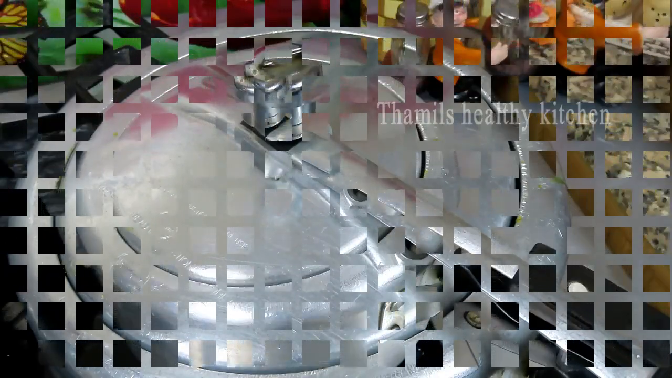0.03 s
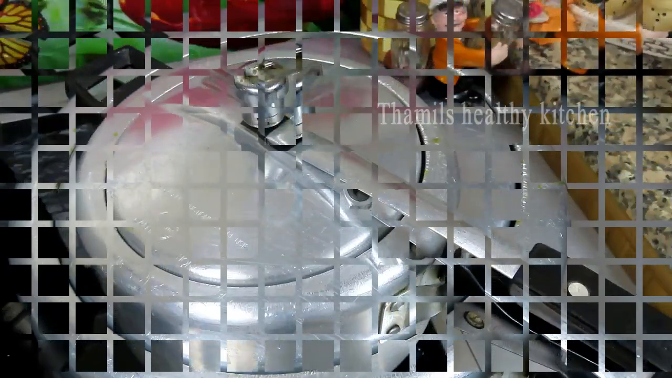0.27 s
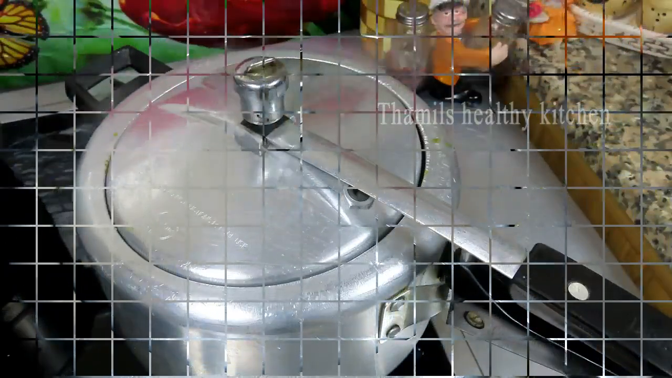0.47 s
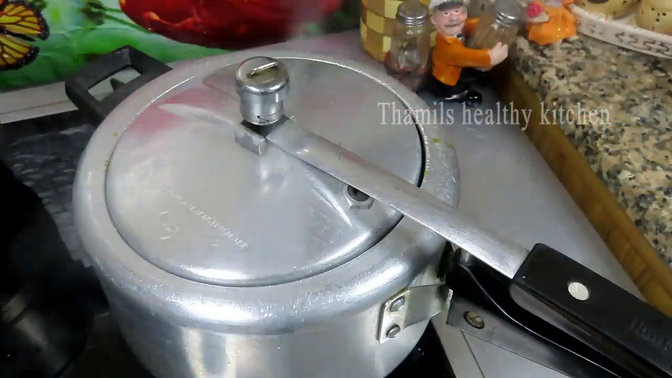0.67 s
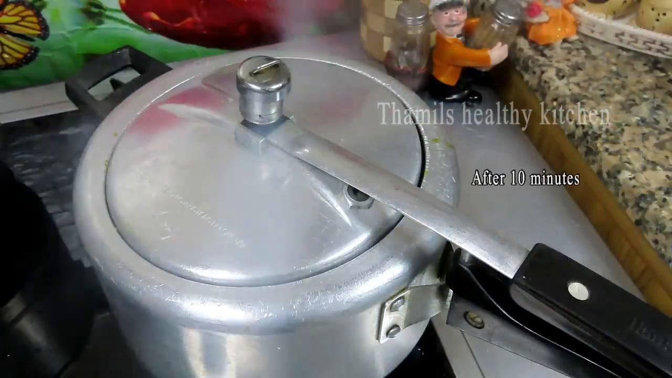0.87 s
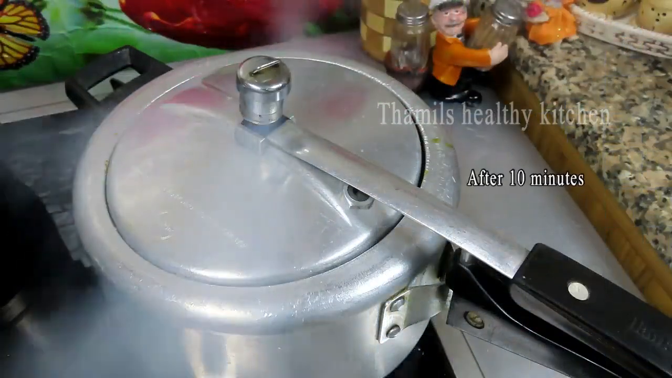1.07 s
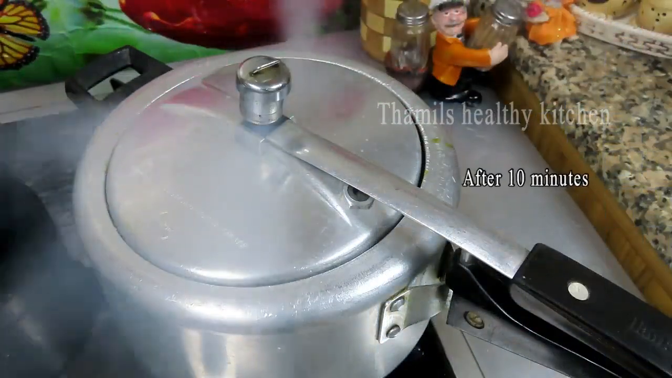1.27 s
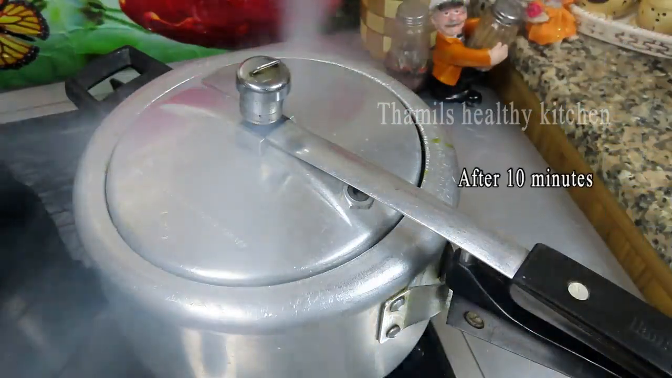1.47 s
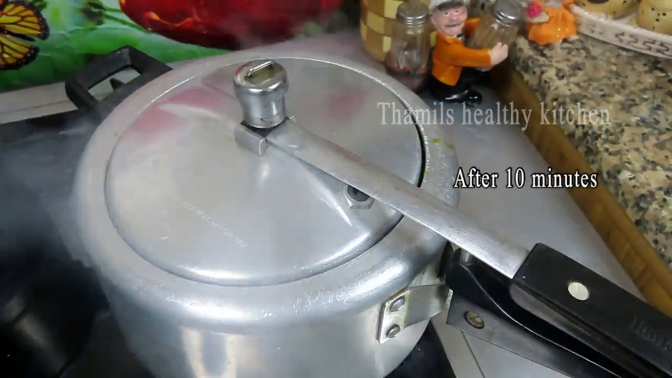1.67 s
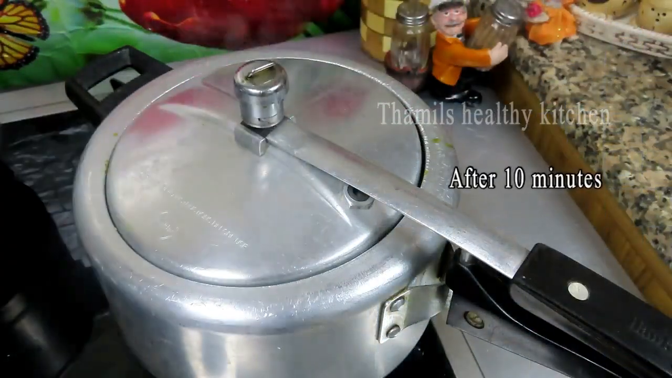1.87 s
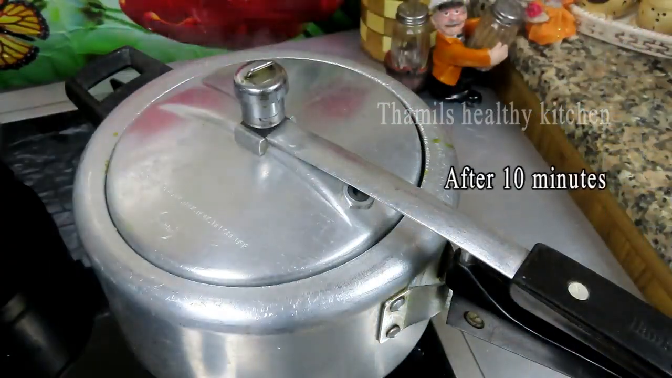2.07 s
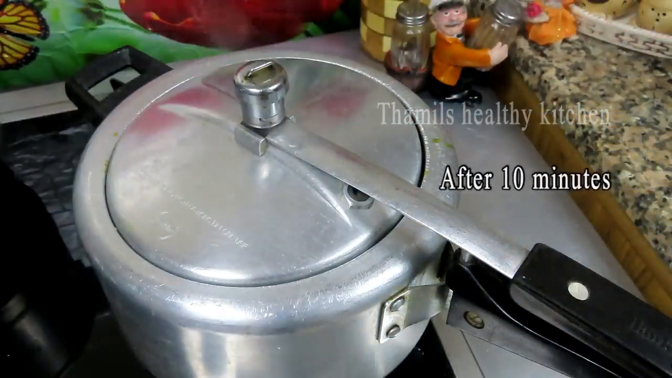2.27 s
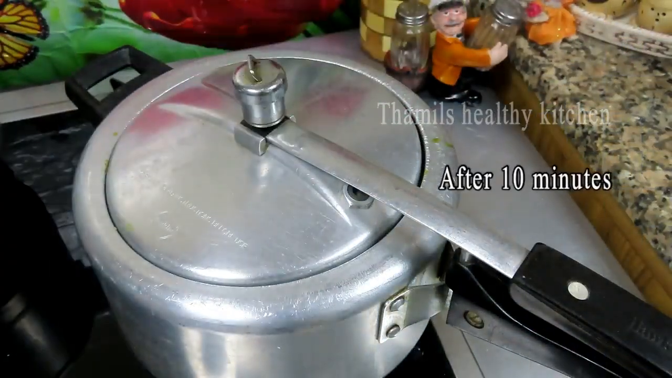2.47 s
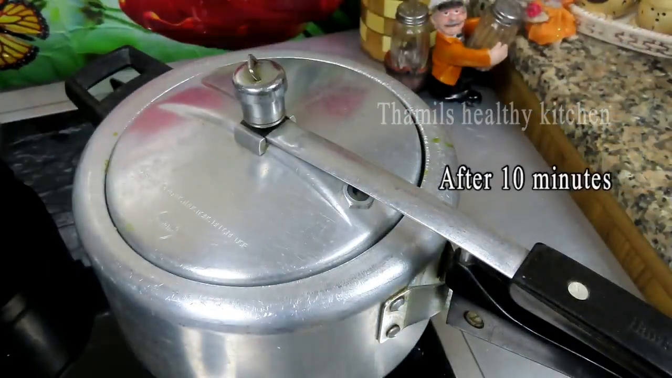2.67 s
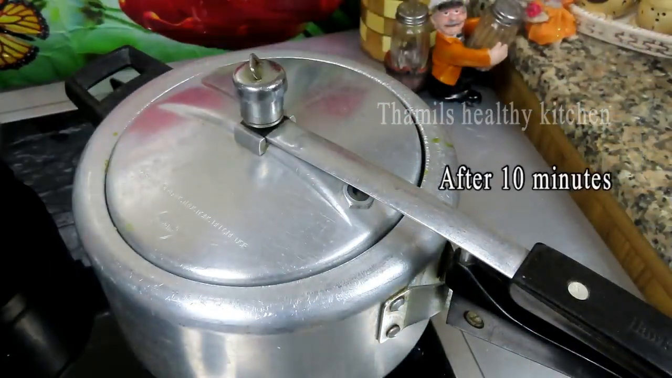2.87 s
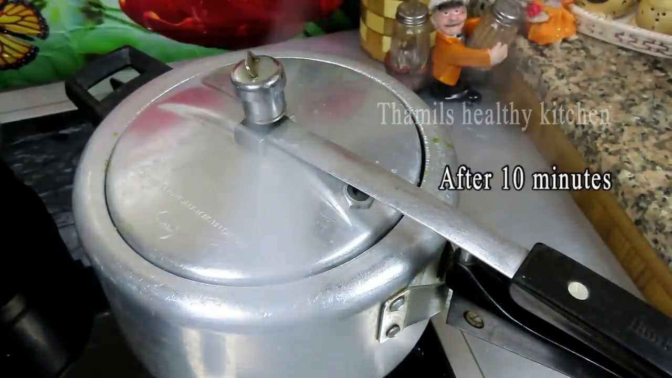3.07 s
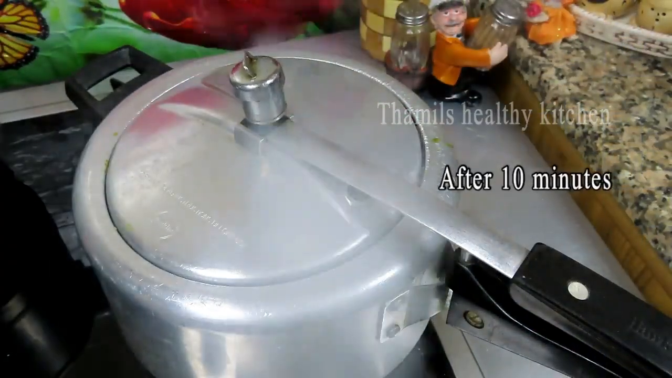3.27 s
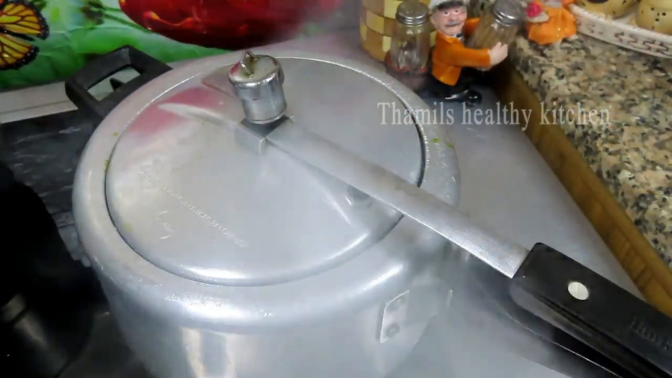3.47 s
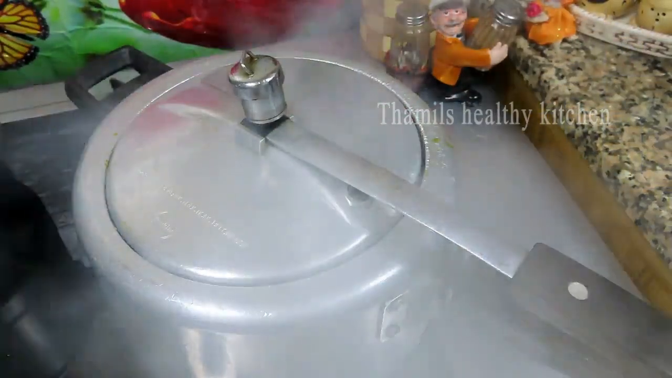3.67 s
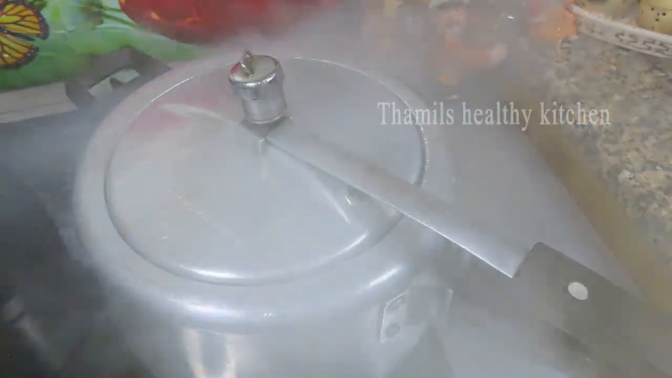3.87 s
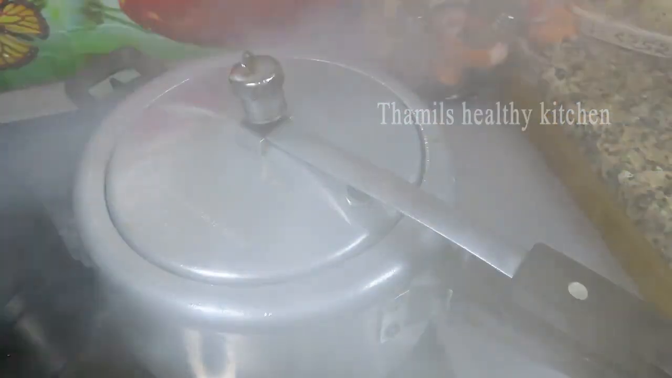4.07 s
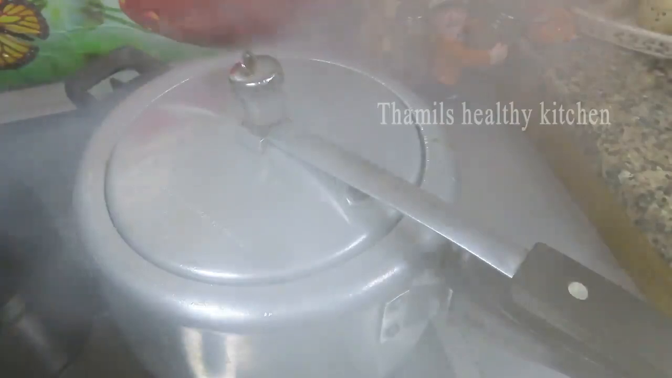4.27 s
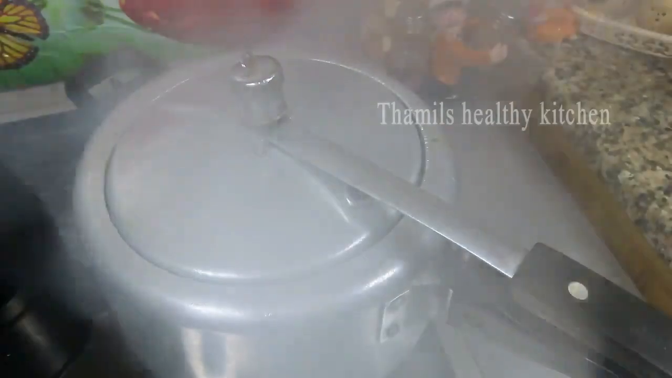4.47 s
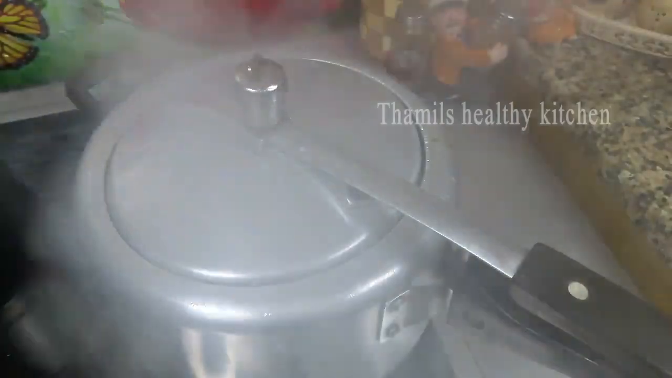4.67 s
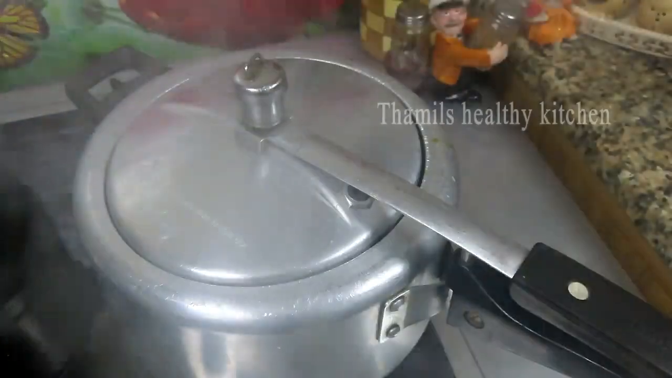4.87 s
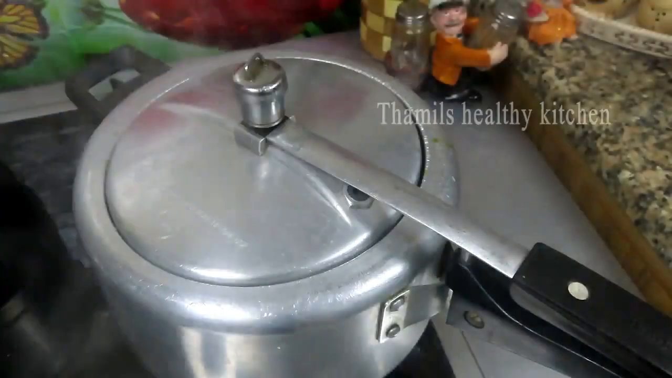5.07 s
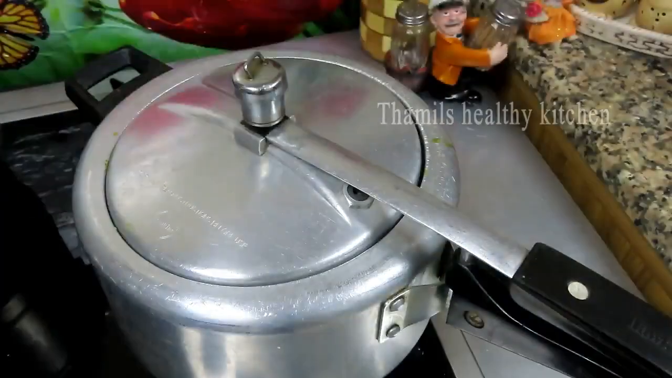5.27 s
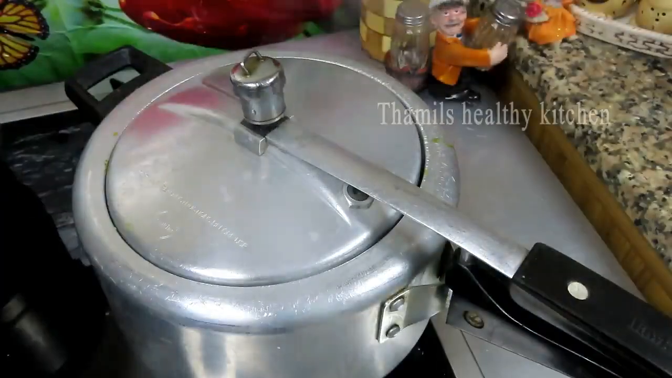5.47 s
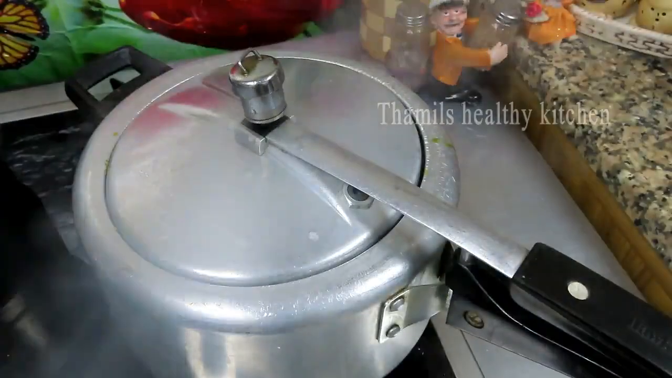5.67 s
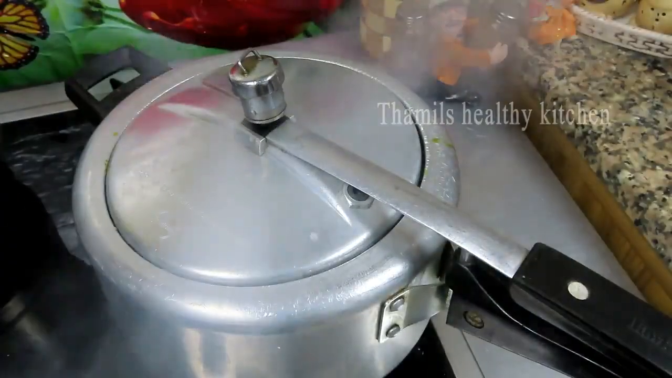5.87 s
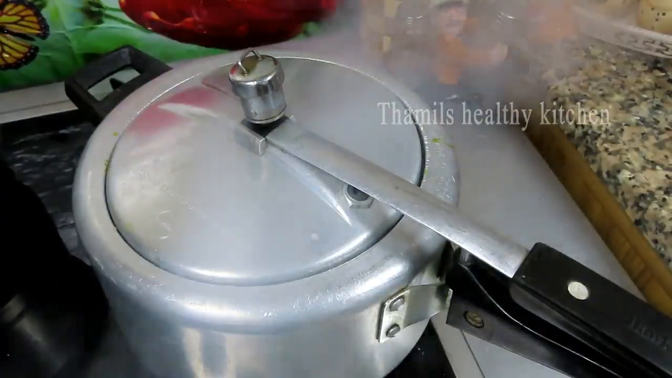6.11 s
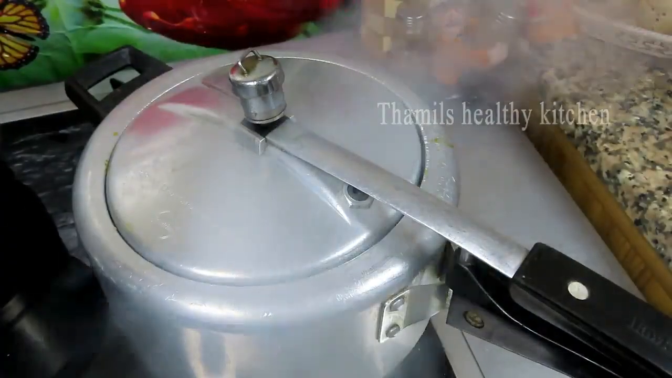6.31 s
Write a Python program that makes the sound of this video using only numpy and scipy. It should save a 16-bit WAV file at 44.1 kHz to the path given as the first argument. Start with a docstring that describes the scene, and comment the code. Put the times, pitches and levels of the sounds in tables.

```python
"""A pressure cooker vents three times in a small kitchen: steam leaks, lifts the weight, sputters and hisses.
The steam is banded noise that follows the valve flow, coloured by lid, walls and a set of peaks per blast.
Dull bangs from further off, perhaps firecrackers, and a low whoosh of steam at the first lift are a short
wave, then decaying noise. A faint knock, a sharp crack and clacks of the weight are noise bursts plus modes.
Puffs pop on the microphone; stirred air, the steam cloud and the steady stove are shaped noise."""
import sys
import numpy as np
from scipy.fft import rfft, irfft, next_fast_len
from scipy.io import wavfile
from scipy.ndimage import map_coordinates

SR = 44100
rng = np.random.default_rng(int(sys.argv[2]) if len(sys.argv) > 2 else 0)


def generate_wav(sig):
    """Save sig (samples, or channels by samples) to the path in sys.argv[1] as 16-bit PCM at SR."""
    pcm = np.round(np.clip(np.atleast_2d(sig).T, -1, 1) * 32767).astype(np.int16)
    wavfile.write(sys.argv[1], SR, pcm)


N = 279726  # samples
TOP_HZ = 15780

# Spectra of the parts of the steam. Each row: frequency in Hz, relative density in dB per Hz.
ROAR_BAND = [(30, -29), (90, -14), (200, -3.5), (450, 0.5), (700, 2), (1100, 1), (1500, -6), (2500, -46)]
SPRAY_BAND = [(600, -30), (1000, -8), (1300, -3.5), (1700, 0.5), (2500, 0), (2900, -9.5), (4000, -48)]
RUSH_BAND = [(1500, -23), (2300, -7.5), (2700, 0), (4000, 1), (5400, 1.5), (6000, -3), (8000, -50)]
RING_BAND = [(4000, -47), (5200, -21), (5700, -0.5), (6800, 3), (7500, 0.5), (8100, -12), (10000, -53)]
FIZZ_BAND = [(6000, -60), (7400, -2), (8100, 2), (10000, 2), (12500, 0.5), (14800, 0.5), (15800, -7)]
# Resonances and notches of weight, lid and nearby surfaces.
# Each row: centre in Hz, width in Hz, gain in dB before scaling by lid_depth.
LID_RESONANCES = [(991, 240, -1.4), (1367, 80, 1.3), (1701, 240, 1.2), (1981, 50, -2.7), (2099, 30, 1.4),
                  (2164, 140, 2.2), (2422, 80, 2.0), (2552, 50, -2.5), (2810, 30, 3.2), (2853, 50, -2.5),
                  (2946, 30, 2.2), (3025, 80, 1.2), (3381, 80, 1.4), (3628, 30, 2.6), (3844, 50, -2.5),
                  (4021, 30, 2.2), (4098, 30, 2.0), (4231, 30, 1.8), (4550, 40, 2.3), (4608, 50, -2.3),
                  (5378, 50, 1.8), (5469, 80, -2.2), (6019, 50, 1.8), (6379, 50, 1.8), (6915, 80, 1.2),
                  (8465, 80, 1.5), (8718, 60, 1.5), (10508, 140, 1.2)]
# Peaks and notches in the colour of each blast. Each row: # centre in Hz, width in Hz, gain in dB.
FIRST_COLOUR = [(546, 150, -4), (1345, 70, 3.5), (1690, 160, 2.5), (1930, 100, 1.5), (2170, 100, 3),
                (5555, 67, 1.5), (5900, 230, 2.5), (6000, 130, -2), (6400, 180, 0.5), (6920, 120, 4.5),
                (7330, 230, 3), (7800, 260, -6), (11500, 480, 2.5), (13500, 500, 2), (13750, 300, -1)]
SECOND_COLOUR = [(2740, 40, 1), (4530, 80, 1.5), (5060, 120, 1.5), (6100, 200, -0.5), (6330, 170, -1.5),
                 (6400, 140, 1.5), (6840, 140, 3), (7460, 160, 3), (7740, 250, -2.5), (8160, 200, 2.5),
                 (8740, 100, 3.5), (9900, 100, 3), (10300, 350, 0), (12300, 800, -2), (15300, 900, 3.5)]
THIRD_COLOUR = [(850, 270, -1.5), (1400, 210, -1.5), (1730, 150, 1.5), (1970, 120, -2), (2670, 120, 2),
                (4400, 220, -3), (4650, 92, 2), (6100, 110, 2.5), (6280, 200, -3), (6360, 200, 3),
                (6800, 120, 2), (8230, 1900, 2.5), (11900, 1400, -2)]
# Stereo width of each blast. Each row: frequency in Hz, side minus mid in dB.
FIRST_WIDTH_DB = [(60, -12), (110, -17), (200, -11), (380, -4), (700, -1.5), (1290, -12), (2380, -13),
                  (4400, -9.5), (6300, -11.5), (7600, -8), (8300, -1), (15000, -2.5)]
SECOND_WIDTH_DB = [(60, -14), (110, -13), (200, -13), (380, -4.5), (700, -2), (1290, -10.5), (2380, -11),
                   (4400, -7), (9000, -17), (15000, -23)]
THIRD_WIDTH_DB = [(60, -12), (110, -18), (200, -15), (380, -7), (700, 0.5), (1290, -12), (2380, -9.5),
                  (4400, -9.5), (7200, -13), (8800, -7.5), (15000, -6)]
# Valve cycle of each blast; the last is still open at the end. Each row: leak start in seconds,
# full lift in seconds, shutting in seconds, leak flow in dB, full flow in dB before the surge,
# rise in dB per second, sag in dB per second, added fizz in dB, added plume in dB.
VALVE_CYCLES = [(-.1, 0.495, 1.669, -48, -21.5, 278, 2, 2.0, 0),
                (2.425, 3.031, 4.645, -43, -22.5, 179, 4, 6, 0.5),
                (5.176, 5.421, 6.5, -44.5, -22.5, 240, 1.5, 4, 0.5)]
# The weight bobs on the jet. Each row: centre in seconds, flow change in dB, half length (to 1/e) in seconds.
WEIGHT_BOBS = [(0.368, 3.5, 0.059), (0.633, -1.5, 0.021), (0.792, 1.5, 0.037), (2.581, 6, 0.042),
               (2.78, -1.5, 0.032), (2.877, 6.5, 0.058), (3.363, 1, 0.064), (3.69, 0.5, 0.32),
               (4.426, 1.35, 0.17), (4.59, 1.4, 0.098), (4.78, 3, 0.067), (5.46, 1, 0.022),
               (5.55, -2, 0.041), (5.627, 2, 0.082), (5.94, -0.5, 0.12)]
# Splashes of condensed water. Each row: peak in seconds, plume gain in dB,
# Gaussian rise scale in seconds, exponential fade scale in seconds.
WATER_SPLASHES = [(.492, 8.7, 0.041, 0.057), (3.02, 3.7, 0.021, 0.091), (3.3, 3.1, 0.38, 0.23),
                  (3.65, 1.1, 0.092, 0.17), (5.418, 9.1, 0.024, .24)]
# Stirred air: spectrum. Each row: frequency in Hz, relative density in dB per Hz.
DRAUGHT_BAND = [(20, -17), (55, -4.5), (110, -2), (170, -3.5), (240, -5), (400, -14), (1000, -58)]
# Stirred air: stereo width. Each row: frequency in Hz, side minus mid in dB.
DRAUGHT_WIDTH_DB = [(60, -22), (130, -19), (250, -11)]
# Burner and simmering pot: spectrum. Each row: frequency in Hz, relative density in dB per Hz.
STOVE_BAND = [(15, -31), (25, -16), (70, -5), (179, -6), (205, -23), (276, -5.5), (352, -14.5),
              (729, -12.5), (881, -14), (1870, -16), (4330, -22.5), (7030, -19), (11100, -25.5),
              (13100, -18.5), (15800, -25)]
# Burner and simmering pot: stereo width. Each row: frequency in Hz, side minus mid in dB.
STOVE_WIDTH_DB = [(60, -31), (110, -31), (200, -22), (380, -6), (700, 0), (1290, -8), (2380, -9),
                  (4400, -6), (8120, -17), (15000, -23)]
# Spurts as the weight first comes off its seat.
# Each row: start in seconds, level in dB, rise constant in seconds, t60 in seconds.
SEAT_SPURTS = [(.272, -24.5, 0.006, 0.083), (.33, -24.5, 0.0073, .1), (.366, -20.5, .008, 0.073),
               (.415, -21.5, 0.0018, .1), (0.434, -12, .0007, 0.074)]
# Spurts: spectrum. Each row: frequency in Hz, relative density in dB per Hz.
SPURT_BAND = [(200, -11), (1500, -7.0), (5000, -10.0), (6200, 3.5), (7400, -1), (8500, -22), (15000, -13)]
# One low whoosh of steam as the first blast lifts (first row), then dull bangs.
# Each row: start in seconds, level in dB, slap offset in dB, thud offset in dB,
# t60 of thud and boom in seconds, pitch of the first wave in Hz.
WHOOSH_AND_BANGS = [(.464, -25, 4.5, -8, 0.18, 698), (1.714, -41, 0, -5, 0.087, 600),
                    (1.749, -40.5, 5, -9, 0.11, 1150), (2.428, -27.5, 4, 0.5, 0.39, 366),
                    (2.449, -22, 3.5, -3, 0.21, 704), (2.51, -17.5, -13, -6, .13, 665),
                    (2.526, -18, -6, -3, 0.27, 444), (2.549, -23, -6, 3, .17, 370),
                    (2.585, -28, -14, -14, 0.16, 602), (2.646, -34, -13, -12, 0.17, 592),
                    (2.668, -29, -18, -14, 0.1, 660), (2.706, -40, -11, -5, 0.56, 595),
                    (2.785, -18, 4.5, -3, 0.28, 680), (2.802, -23, 7, -3, .2, 910),
                    (2.836, -14, -10, -3, .21, 585), (2.885, -24.5, -5, -8, .27, 590),
                    (3.015, -24.5, -10, -12, 0.13, 468), (3.374, -31.5, 11, 2, 0.29, 985),
                    (4.041, -32.5, -8.5, -11, 0.22, 660), (4.355, -33, 8.5, -7.5, 0.3, 670),
                    (4.632, -32.5, 6, -15, 0.13, 440), (4.68, -35, 9, -8, 0.28, 610),
                    (4.715, -34, -3, -9, 0.14, 608), (4.738, -40, 8, -6, .15, 600),
                    (4.775, -48, 5, 6, 0.14, 600), (4.887, -42.5, 4.5, -10, .15, 706),
                    (4.953, -33.5, 6, -7, 0.51, 510), (4.997, -30.5, 6.5, -3, .3, 427),
                    (5.279, -34.5, 1, 1, .27, 366), (5.359, -23, 2, 1, 0.15, 350)]
# Noise after the first wave: spectra. Each row: frequency in Hz, relative density in dB per Hz.
THUD_BAND = [(40, -32), (150, -19.5), (260, -6.5), (360, -1), (430, -7), (600, -16), (1200, -60)]
BOOM_BAND = [(200, -29), (360, -7), (450, -1.5), (560, -2.5), (680, -2.5), (850, -16.5), (1200, -17.5),
             (1700, -21), (4000, -53)]
SLAP_BAND = [(100, -39), (250, -10), (650, -6), (950, 7), (1250, -1), (1700, -8), (2400, -12.5),
             (3200, -20), (6000, -46), (15000, -54)]
# Resonances of the kitchen under whoosh and bangs. Each row: centre in Hz, width in Hz, gain in dB.
KITCHEN_RESONANCES = [(305, 76, -1.5), (362, 44, 8), (410, 35, -4), (459, 20, 8), (490, 26, -2),
                      (594, 40, 4.5), (669, 58, 6), (760, 55, 0), (946, 40, -15), (1064, 48, -1.5),
                      (1174, 80, 2.5), (1720, 110, 5.5)]
# Balance of whoosh and bangs. Each row: frequency in Hz, left minus right in dB.
BANG_BALANCE_DB = [(200, 0), (380, 0), (680, -4.5), (1100, 0.5), (2400, -1)]
# The cloud of each blast drifts over the microphone.
# Each row: arrival in seconds, leaving in seconds, level in dB, fade in dB per second.
CLOUD_PASSES = [(0.714, 1.68, -41, 13.5), (3.215, 4.66, -41, 7), (5.55, 6.5, -39, 10.5)]
# Cloud on the microphone: spectrum. Each row: frequency in Hz, relative density in dB per Hz.
WASH_BAND = [(50, -15), (130, -4.5), (280, 0.5), (450, -3), (900, -9), (1400, -5), (3000, -36)]
# Puffs on the microphone. Each row: start in seconds, level in dB,
# half the right-minus-left difference as a share of the mean, before filtering.
MICROPHONE_PUFFS = [(0.976, -22.5, .3), (1.155, -19, 0.22), (3.48, -17, 0.62), (3.639, -18.5, 2.2),
                    (3.8, -19, 1.3), (3.8858, -8, 3.3), (3.895, -12, 0.49), (4.013, -20, 1.4),
                    (4.655, -29, .4), (5.69, -15.5, 0.38)]
# Hollow knock: spectrum. Each row: frequency in Hz, relative density in dB per Hz.
KNOCK_BAND = [(60, -12), (180, -7), (250, -5), (330, -12), (600, -2.5), (900, -13), (1500, -7.5),
              (2200, -16), (3200, -20.5), (6500, -23), (12000, -45)]
# Hollow knock: modes. Each row: frequency in Hz, level in dB, t60 in seconds.
KNOCK_RINGS = [(250, -35, 0.39), (640, -49, .35), (1410, -41, 0.39), (2008, -54, .4)]
# The weight knocks on its stem. Each row: start in seconds, ring gain in dB, contact level in dB, favoured Hz.
STEM_CLACKS = [(3.373, -10, -27, 2200), (5.407, -13, -20.5, 3380), (5.417, -9, -27, 2200),
               (5.429, -10, -27, 3540), (5.502, 0.5, -19.5, 3000)]
# Modes of the weight. Each row: frequency in Hz, level in dB before the favour, t60 in seconds.
WEIGHT_MODES = [(1088, -15, .12), (1154, -19.5, 0.12), (1590, -27, .11), (2140, -23, .1), (2952, -20, 0.26),
                (3247, -25, 0.33), (3375, -30, .12), (3540, -22, .18), (3930, -23, 0.073)]
# Weight on stem: contact spectrum. Each row: frequency in Hz, relative density in dB per Hz.
CONTACT_BAND = [(100, -7.5), (600, -4.5), (1100, -7), (2400, -1.5), (4000, 0.5), (7000, -30), (15000, -33)]
# Crack: spectrum. Each row: frequency in Hz, relative density in dB per Hz.
CRACK_BAND = [(60, -3), (200, -18), (400, 0), (800, -5), (1400, -5.5), (2100, -14), (3200, -2),
              (4300, -11.5), (7500, -8.5), (9000, -20), (15500, -16)]
# Pot and lid ringing after the crack. Each row: frequency in Hz, level in dB, t60 in seconds.
POT_MODES = [(359, -22, 0.27), (498, -14.5, 0.13), (625, -31, 0.14), (700, -27, 0.19), (775, -17, 0.15),
             (1130, -28, 0.14), (1440, -27, 0.2), (1678, -32, 0.2), (2270, -27, 0.17), (2950, -28, .14),
             (3260, -17, 0.098), (3440, -24.5, 0.3)]
# Balance of the two microphone ports. Each row: frequency in Hz, left minus right in dB.
PORT_BALANCE_DB = [(100, -.3), (450, -1.2), (1000, -0.6), (2000, 0.5), (4000, 1), (7000, 0.2), (12000, 0)]
# Widths of the lesser sources. Each row: frequency in Hz, side minus mid in dB.
SPURT_WIDTH_DB = [(1000, -16)]
BANG_WIDTH_DB = [(300, -27), (1400, -19), (3000, -12)]
WASH_WIDTH_DB = [(100, 1.9), (400, 7.9)]
KNOCK_WIDTH_DB = [(1000, -14)]
CONTACT_WIDTH_DB = [(1000, -29), (3500, -14)]
CRACK_WIDTH_DB = [(400, -20), (1400, -12), (3500, -5), (10000, -9)]

SURGE_DB, SURGE_S = 3, 0.15  # the stored pressure overshoots as the weight lifts
SHUT_DB_PER_S, PLUME_SHUT_DB_PER_S = 176, 151  # the sinking weight chokes the jet; the plume dies more slowly
RUSH_LINGER_S, LINGER_S = 0.012, 0.029  # rush, then plume, outlast ring and fizz
USUAL_FLOW_DB = -23
# Laws of the steam parts: dB at the usual flow, dB gained per dB of flow
RING_LAW, FIZZ_LAW, SPRAY_LAW, ROAR_LAW = (-21.5, 0.97), (-23, 1.0), (-29.5, 0.8), (-37.5, 0.46)
BOB_TREBLE = 0.57  # extra share of the bob in ring and fizz
DULLING_DB_PER_S = 1.0  # extra fade of ring and fizz as the pressure drops
DRYING_DB_PER_S = 4  # the plume grows drier after the lift
SPRAY_WET_SHARE = 0.41  # share of splash and drying that the spray follows
SPLASH_WIDTH = 0.092  # share of a splash, in dB, that reaches the side signal
STIR_DB, STIR_HOLD_S, STIR_FADE_DB_PER_S = -46, 0.49, 10
BANG_RISE_S, THUD_RISE_S, SLAP_T60_S = 0.00073, 0.0074, 0.39
FRONT_RISE_S, FRONT_T60_S = 0.00029, 0.11  # first wave of whoosh or bang
FAVOUR_DB, FAVOUR_WIDTH_HZ = 4.5, 250  # where the weight is struck decides which modes speak
RING_RISE_S = 0.0012  # struck metal sounds almost at once
STOVE_DB = -51.5


def amp(db):
    """Decibels to gain."""
    return 10 ** (np.asarray(db) / 20)


def unit(x):
    """Scale to rms 1 over all channels."""
    return x / np.sqrt(np.mean(x ** 2) + 1e-20)


def along(points, hz):
    """Interpolate (Hz, value) points on a log frequency axis."""
    f, v = np.transpose(points)
    return np.interp(np.log(hz + 1), np.log(f + 1), v)


def since(s):
    """Seconds gone by since time s, zero before it."""
    return np.maximum(np.arange(N) / SR - s, 0)


def until(s):
    """Seconds left until time s, zero after it."""
    return np.maximum(s - np.arange(N) / SR, 0)


def filtered(x, response):
    """Apply a response of frequency to x."""
    m = next_fast_len(N + 8192)
    return irfft(rfft(x, m) * response(np.fft.rfftfreq(m, 1 / SR)), m)[..., :N]


def noise(spectrum, colour=lambda hz: 1):
    """Independent mid and side noise of joint rms 1."""
    white = rng.standard_normal((2, N))
    return unit(filtered(white, lambda hz: amp(along(spectrum, hz)) * colour(hz)))


def stereo(pair, width):
    """Left and right from mid and side, with a (Hz, dB) width."""
    mid = pair[0]
    side = filtered(pair[1], lambda hz: amp(along(width, hz)))
    return np.array([mid + side, mid - side])


def panned(pair, balance):
    """Tip left against right by a (Hz, dB) balance."""
    return filtered(pair, lambda hz: amp(np.outer([.5, -.5], along(balance, hz))))


def wobble(rate_hz):
    """A smooth random curve with rate_hz knots a second."""
    knots = rng.standard_normal(int(N * rate_hz / SR) + 4)
    return map_coordinates(knots, [np.arange(N) * rate_hz / SR])


def burst(s, rise_s, t60_s):
    """An envelope that rises at time s and dies away exponentially."""
    t = since(s)
    return (1 - np.exp(-t / rise_s)) * amp(-60 * t / t60_s)


def resonances(table, hz):
    """Gain of (Hz, width Hz, dB) Gaussian peaks and notches."""
    return amp(sum(db * np.exp(-(2 * (hz - centre) / width) ** 2) for centre, width, db in table))


def ringing(modes, s, blur_rad=0.23):
    """Modes set off at time s: decaying sines of slightly unsteady phase."""
    t = np.arange(SR // 2) / SR
    knots = 64 * len(modes)
    positions = np.linspace(0, knots - 1, len(modes) * len(t))
    drift = map_coordinates(rng.standard_normal(knots), [positions]).reshape(len(modes), -1)
    ring = 0
    for k, ((hz, db, t60_s), phase) in enumerate(zip(modes, drift)):
        mode = np.sin(2 * np.pi * hz * t + blur_rad * phase)
        ring = ring + (-1) ** k * amp(db - 60 * t / t60_s) * mode
    return np.pad(ring * (1 - np.exp(-t / RING_RISE_S)), (round(s * SR), N))[:N]


def seal_open(opens, opening_s=0.00063):
    """The seal gives way almost at once."""
    return 1 - np.exp(-since(opens) / opening_s)


def flow_db(lifts, shuts, leak_db, full_db, rise, sag, fall=SHUT_DB_PER_S):
    """Valve flow: a leak, a rise that overshoots, a slow sag as the pressure drops, then the fall."""
    surge_db = SURGE_DB * np.exp(-(since(lifts) / SURGE_S) ** 2)
    lifted_db = full_db + surge_db - rise * until(lifts) - sag * since(lifts)
    return 20 * np.log10(np.hypot(amp(leak_db), amp(lifted_db))) - fall * since(shuts)


def follow(law, flow):
    """Level in dB of one part of the steam at a given flow."""
    level_db, growth = law
    return level_db + growth * (flow - USUAL_FLOW_DB)


def surroundings(lid_depth=1.44, echo_share=0.31):
    """Constant colour of the jet: lid resonances, finely rippled by the kitchen's echoes."""
    m = next_fast_len(N + 8192)
    echoes = rng.standard_normal((2, N)) * burst(.002, .001, .11)
    ripple = np.abs(1 + echo_share * rfft(echoes / np.linalg.norm(echoes[0]), m))
    gain = resonances(LID_RESONANCES, np.fft.rfftfreq(m, 1 / SR)) ** lid_depth * ripple
    return lambda hz: gain


def steam(flutter_db=0.77, sway_db=0.62, gurgle_db=2.0, slosh_db=2.5):
    """Three blasts: the fast jet hisses while condensed water makes the slower plume gurgle."""
    colour = surroundings()
    bands = (RUSH_BAND, RING_BAND, FIZZ_BAND, ROAR_BAND, SPRAY_BAND)
    rush, ring, fizz, roar, spray = [noise(band, colour) for band in bands]
    bob = sum(db * np.exp(-((since(0) - s) / length) ** 2) for s, db, length in WEIGHT_BOBS)
    tremble = amp(flutter_db * wobble(130) + sway_db * wobble(21.78))  # the weight trembles on the jet
    gurgle = gurgle_db * wobble(45) + slosh_db * wobble(11)
    splash = sum(db * np.exp(-(until(s) / rise) ** 2 - since(s) / fade)
                 for s, db, rise, fade in WATER_SPLASHES)
    widths = (FIRST_WIDTH_DB, SECOND_WIDTH_DB, THIRD_WIDTH_DB)
    blast_colours = (FIRST_COLOUR, SECOND_COLOUR, THIRD_COLOUR)
    out = 0
    for cycle, width, blast_colour in zip(VALVE_CYCLES, widths, blast_colours):
        opens, lifts, shuts, leak_db, full_db, rise, sag, fizz_db, plume_db = cycle
        flow = (leak_db, full_db, rise, sag)
        jet = flow_db(lifts, shuts, *flow) + bob
        stream = flow_db(lifts, shuts + RUSH_LINGER_S, *flow) + bob
        plume = flow_db(lifts, shuts + LINGER_S, *flow, PLUME_SHUT_DB_PER_S) + bob
        wet = np.outer([1, SPLASH_WIDTH], splash) - DRYING_DB_PER_S * since(lifts)  # mid, side

        treble = amp(follow(RING_LAW, jet)) * ring + amp(follow(FIZZ_LAW, jet) + fizz_db) * fizz
        treble = amp(BOB_TREBLE * bob - DULLING_DB_PER_S * since(lifts)) * treble
        hiss = amp(stream) * rush + treble
        cloud = amp(follow(ROAR_LAW, plume) + wet + gurgle) * roar
        cloud = cloud + amp(follow(SPRAY_LAW, plume) + SPRAY_WET_SHARE * wet) * spray
        voiced = filtered(hiss + amp(plume_db) * cloud, lambda hz: resonances(blast_colour, hz))
        out = out + stereo(seal_open(opens) * tremble * voiced, width)
    return out


def draught():
    """Air stirred by each blast rumbles softly at the ports and calms as the pressure drops."""
    stir = 0
    for opens, lifts, shuts, *_ in VALVE_CYCLES:
        calming_db = STIR_FADE_DB_PER_S * since(lifts + STIR_HOLD_S)
        stir = stir + seal_open(opens) * amp(-calming_db - SHUT_DB_PER_S * since(shuts))
    return amp(STIR_DB) * stir * stereo(noise(DRAUGHT_BAND), DRAUGHT_WIDTH_DB)


def stove():
    """The burner and the simmering pot sound throughout as steady noise."""
    return amp(STOVE_DB) * stereo(noise(STOVE_BAND), STOVE_WIDTH_DB)


def spit():
    """Bright spurts escape as the weight first comes off its seat."""
    spurts = sum(amp(db) * burst(s, rise, t60) for s, db, rise, t60 in SEAT_SPURTS)
    return stereo(spurts * noise(SPURT_BAND), SPURT_WIDTH_DB)


def whoosh_and_bangs(slap_db=-8, boom_db=-1):
    """A low steam whoosh, then distant bangs: each one short wave plus decaying thud, boom and slap noise."""
    thud_power = boom_power = slap_power = front = 0
    for s, db, bright_db, bass_db, t60, hz in WHOOSH_AND_BANGS:
        thud_power = thud_power + (amp(db + bass_db) * burst(s, THUD_RISE_S, t60)) ** 2
        boom_power = boom_power + (amp(db + boom_db) * burst(s, BANG_RISE_S, t60)) ** 2
        slap_power = slap_power + (amp(db + bright_db + slap_db) * burst(s, BANG_RISE_S, SLAP_T60_S)) ** 2
        wave = np.sin(2 * np.pi * hz * since(s))
        front = front + amp(db) * burst(s, FRONT_RISE_S, FRONT_T60_S) * wave
    room = lambda hz: resonances(KITCHEN_RESONANCES, hz)
    layers = ((thud_power, THUD_BAND), (boom_power, BOOM_BAND), (slap_power, SLAP_BAND))
    tails = sum(np.sqrt(power) * noise(band, room) for power, band in layers)
    return panned(front + stereo(tails, BANG_WIDTH_DB), BANG_BALANCE_DB)


def wash(arrival_s=0.055, swirl_db=4.0):
    """The drifting cloud rustles unevenly over the two ports."""
    near = 0
    for arrives, leaves, db, fade in CLOUD_PASSES:
        level = amp(db - fade * since(arrives) - SHUT_DB_PER_S * since(leaves))
        near = near + level * (1 - np.exp(-since(arrives) / arrival_s))
    return near * amp(swirl_db * wobble(16)) * stereo(noise(WASH_BAND), WASH_WIDTH_DB)


def puffs(push_s=0.0015, shared_hz=170):
    """Each puff is one push of pressure and a slower rebound; both ports share its deepest part."""
    push = lambda t: (t > 0) * (t / push_s - 1) * np.exp(-t / push_s)
    pair = sum(amp(db) * np.outer([1, uneven], push(since(s))) for s, db, uneven in MICROPHONE_PUFFS)
    mid, side = 1.73 * filtered(pair, lambda hz: 1 / (1 + 1j * hz / 550) ** 2)
    side = filtered(side, lambda hz: (1j * hz / (shared_hz + 1j * hz)) ** 2)
    return np.array([mid - side, mid + side])


def knock(s=2.002, level_db=-32.5, echo_db=-35.5, echo_delay_s=0.043):
    """A faint hollow knock from further off: noise and modes, with a late, duller echo."""
    first = amp(level_db) * burst(s, .004, .28) * noise(KNOCK_BAND)
    dull = lambda hz: 1 / (1 + (hz / 2600) ** 4)
    echo = amp(echo_db) * burst(s + echo_delay_s, .01, .3) * noise(KNOCK_BAND, dull)
    return stereo(first + echo, KNOCK_WIDTH_DB) + ringing(KNOCK_RINGS, s)


def struck(near_hz):
    """Modes of the weight, raised around the frequency that the strike favours."""
    favour_db = lambda hz: FAVOUR_DB * np.exp(-(2 * (hz - near_hz) / FAVOUR_WIDTH_HZ) ** 2)
    return [(hz, db + favour_db(hz), t60) for hz, db, t60 in WEIGHT_MODES]


def clack():
    """The lifted weight chatters on its stem, then knocks hard: contact noise and brief modes."""
    contact = sum(amp(db) * burst(s, 0.00061, 0.24) for s, _, db, _ in STEM_CLACKS)
    ring = sum(amp(ring_db) * ringing(struck(hz), s) for s, ring_db, _, hz in STEM_CLACKS)
    return ring + stereo(contact * noise(CONTACT_BAND), CONTACT_WIDTH_DB)


def crack(s=5.316, snap_db=-6.0, tail_db=-22):
    """A sharp report: a bright snap dies at once, a duller tail and the pot's modes ring on."""
    snap = amp(snap_db) * burst(s, 0.00012, 0.037) * noise(CRACK_BAND)
    dull = lambda hz: 1 / (1 + (hz / 7000) ** 6)
    tail = amp(tail_db) * burst(s, 0.0045, 0.68) * noise(CRACK_BAND, dull)
    return stereo(snap + tail, CRACK_WIDTH_DB) + ringing(POT_MODES, s)


def scene():
    """Everything at the two microphone ports."""
    air = steam() + draught() + stove() + spit() + wash() + puffs()
    short_sounds = whoosh_and_bangs() + knock() + clack() + crack()
    return panned(air + short_sounds, PORT_BALANCE_DB)


def record(dry):
    """Soft saturation rounds off the highest peaks; a steep low-pass then removes all from TOP_HZ up."""
    held = dry / (1 + np.abs(dry) ** 8) ** (1 / 8)
    return filtered(held, lambda hz: hz < TOP_HZ)


dry = scene()
out = record(dry)
generate_wav(out)
```